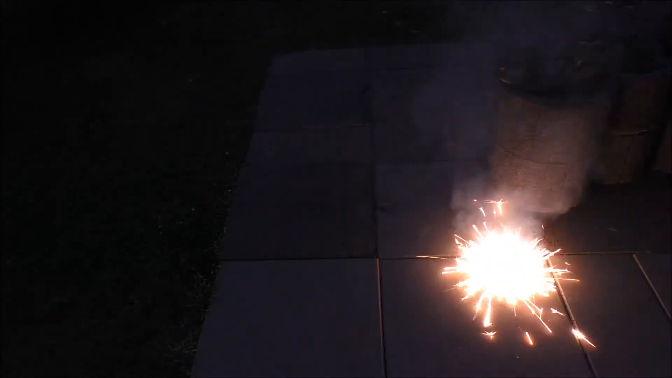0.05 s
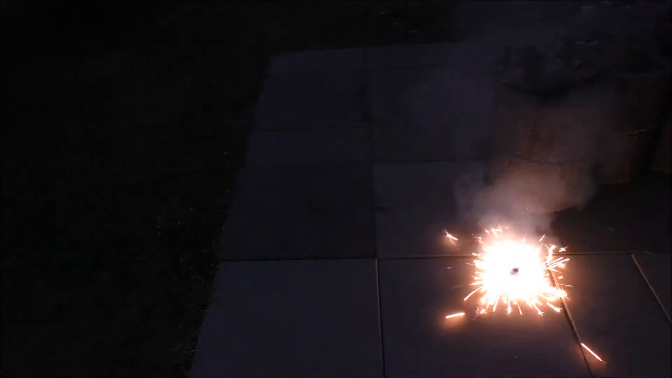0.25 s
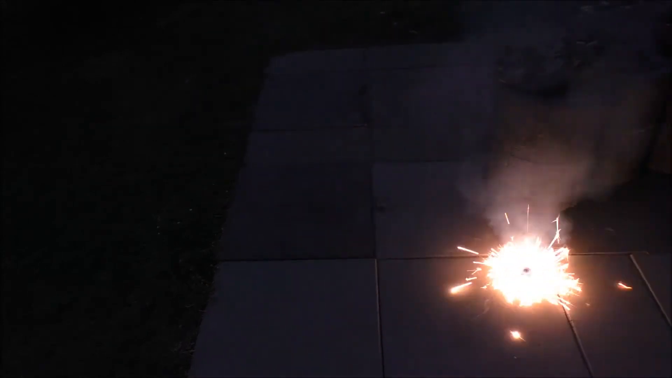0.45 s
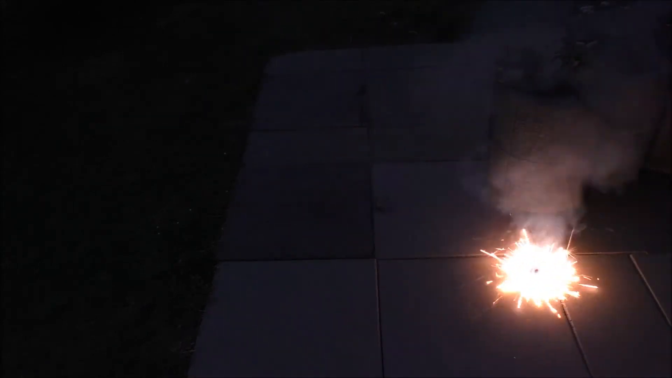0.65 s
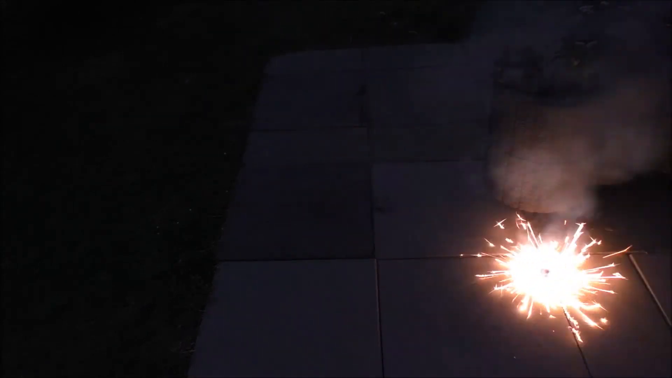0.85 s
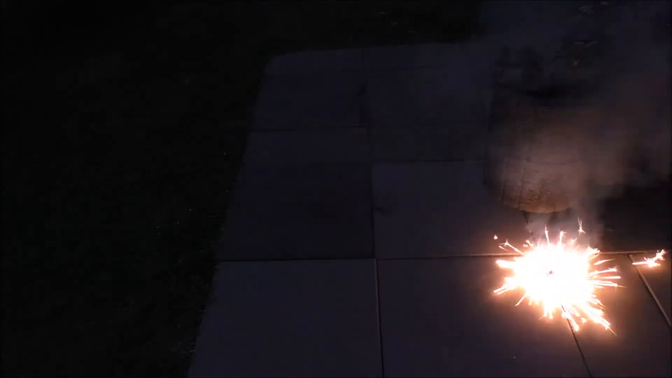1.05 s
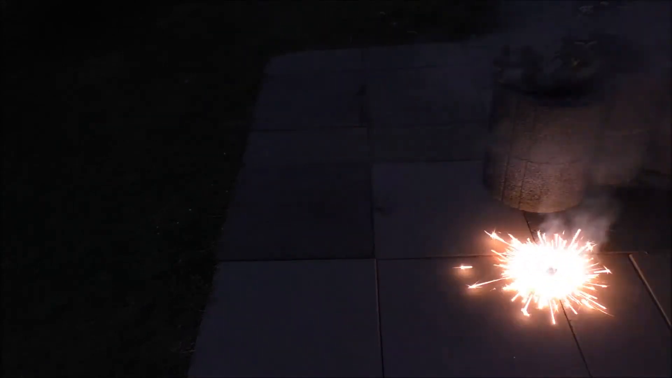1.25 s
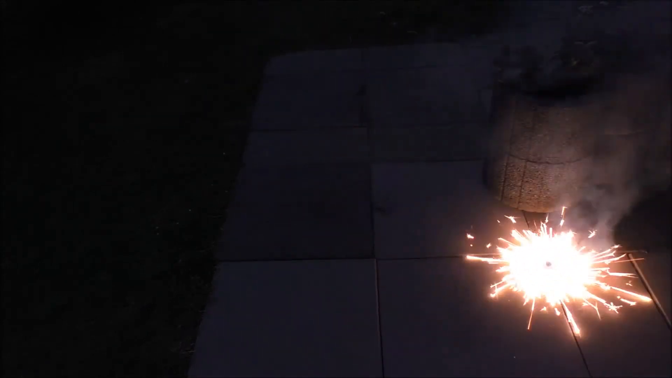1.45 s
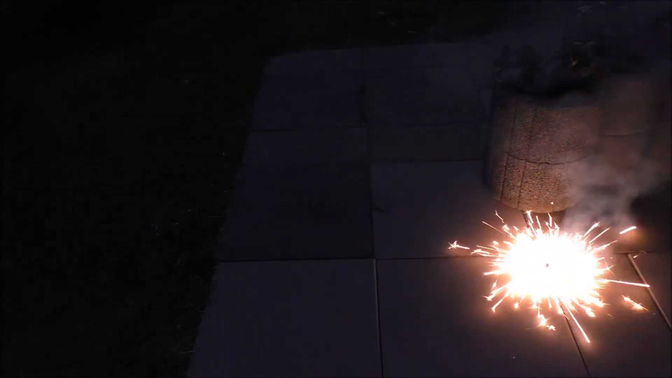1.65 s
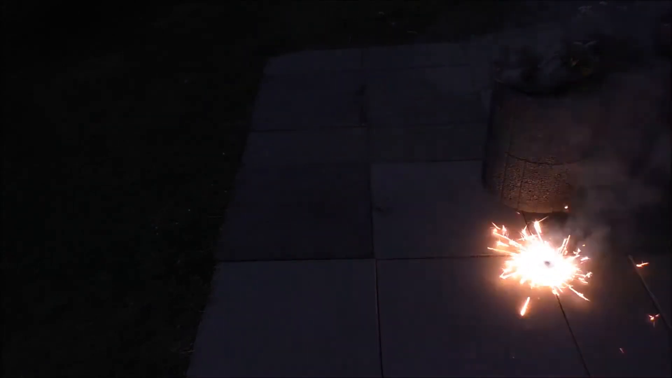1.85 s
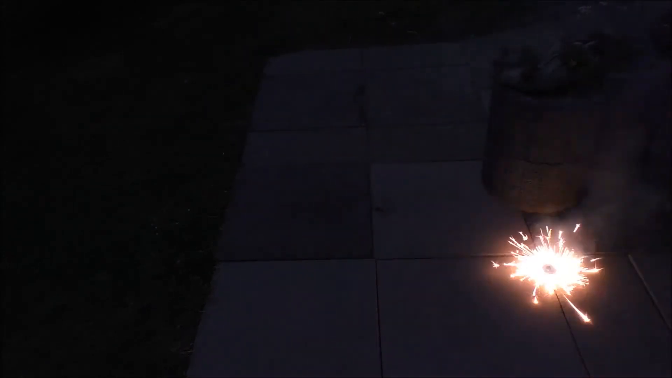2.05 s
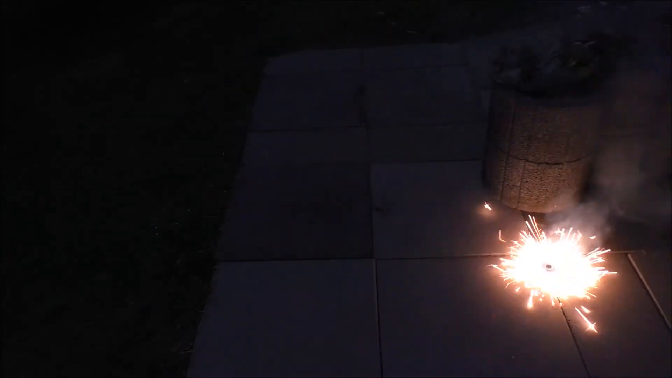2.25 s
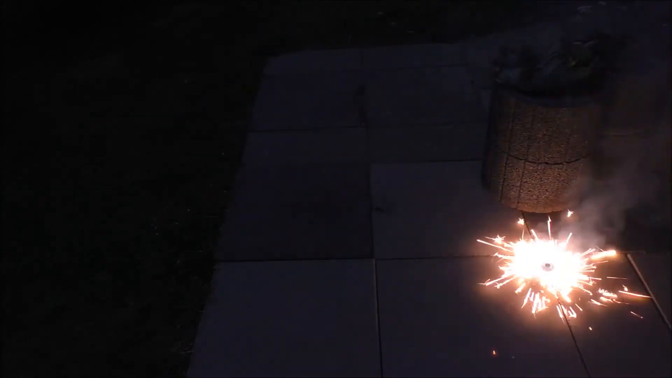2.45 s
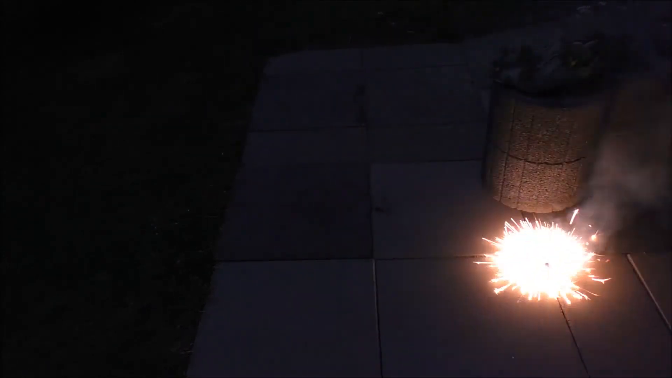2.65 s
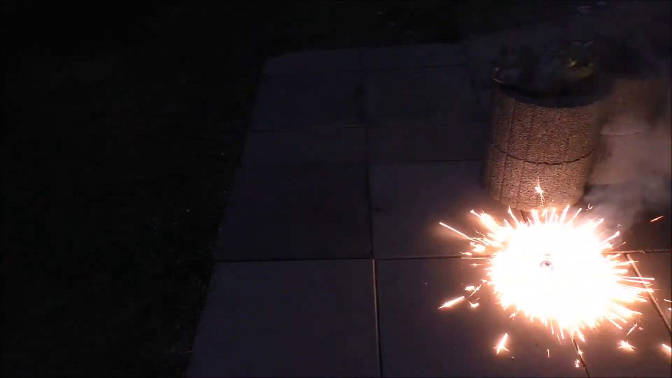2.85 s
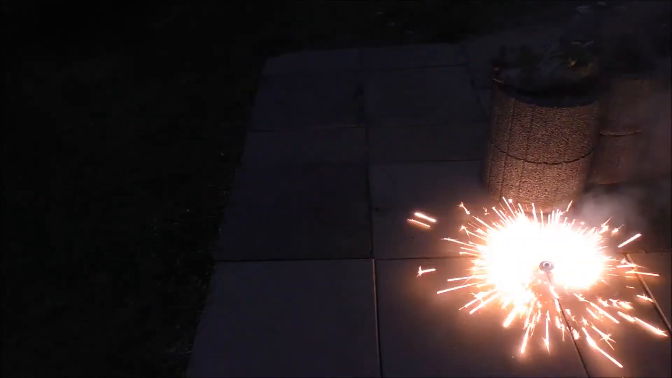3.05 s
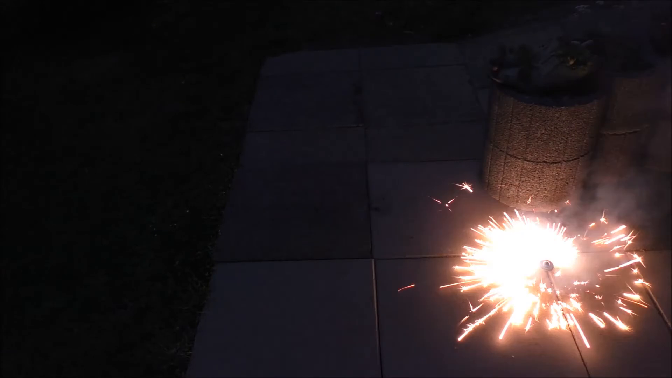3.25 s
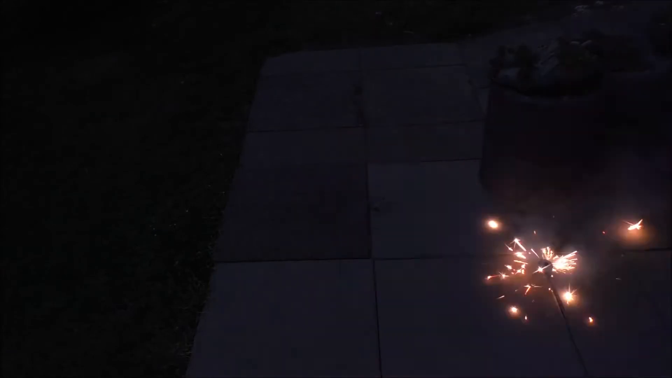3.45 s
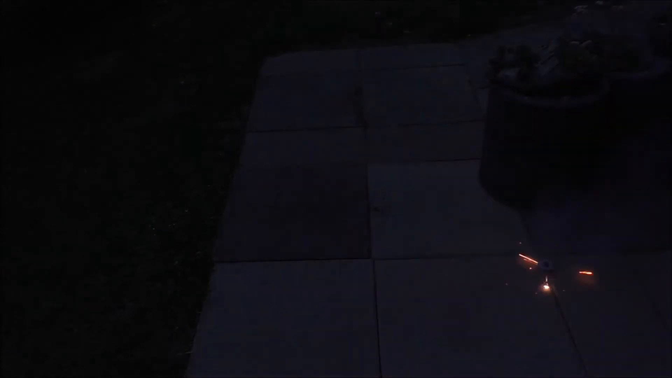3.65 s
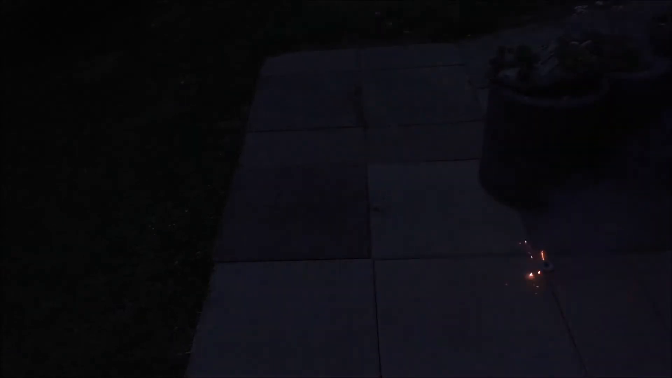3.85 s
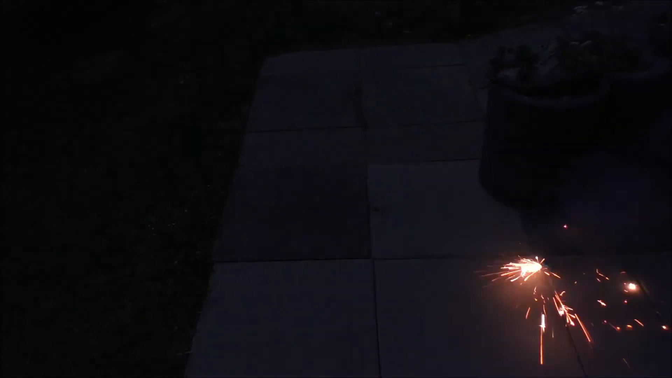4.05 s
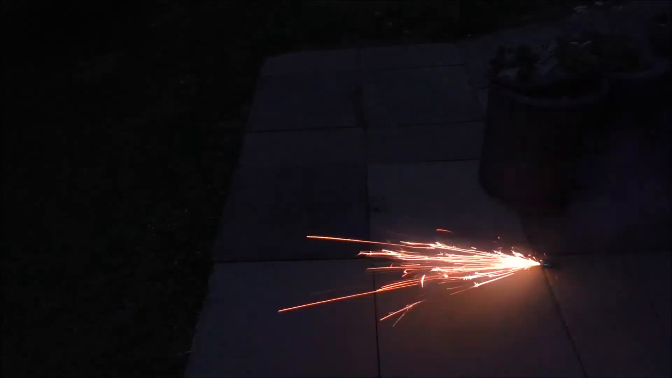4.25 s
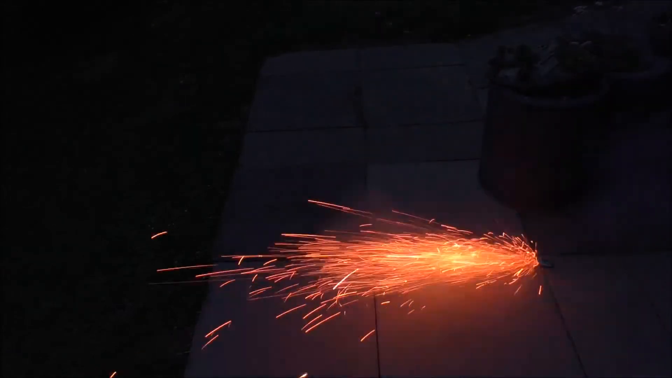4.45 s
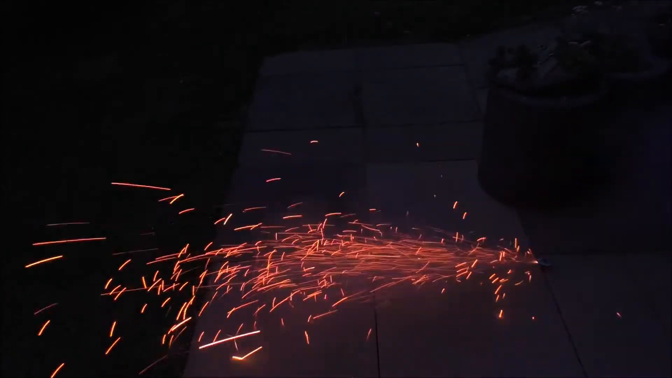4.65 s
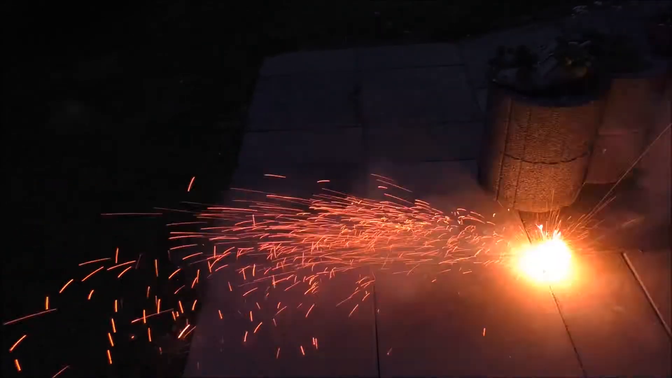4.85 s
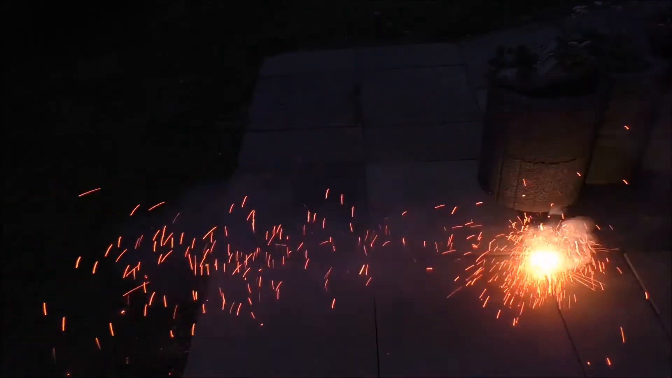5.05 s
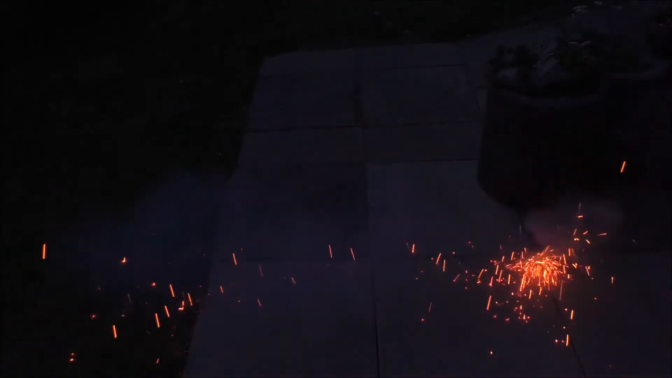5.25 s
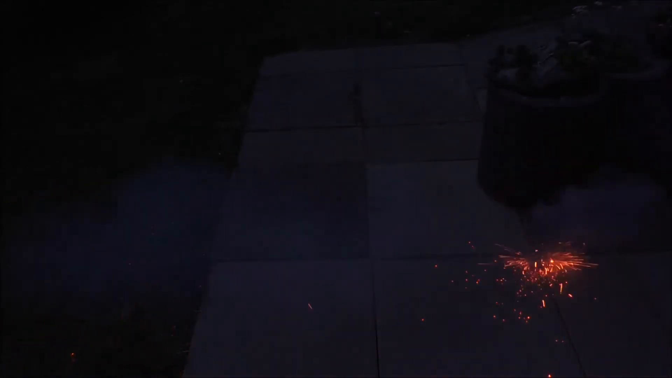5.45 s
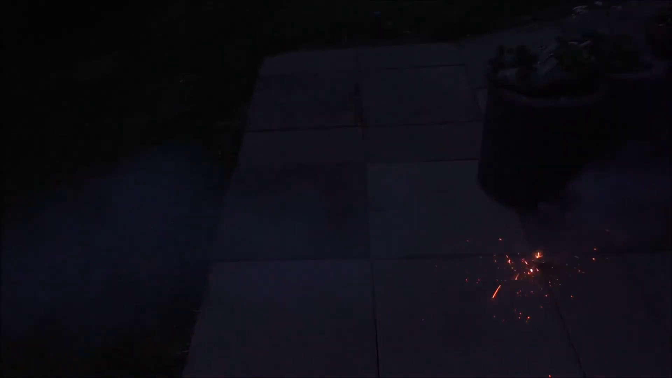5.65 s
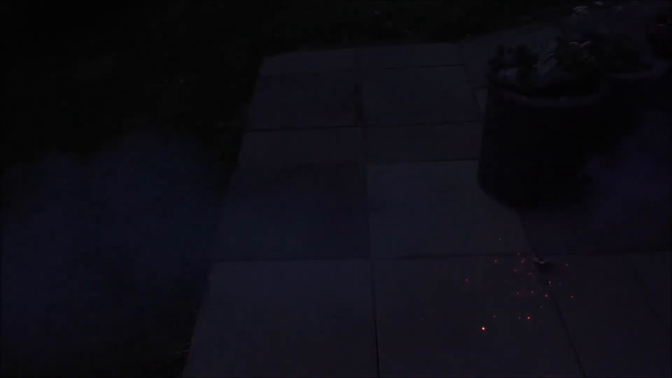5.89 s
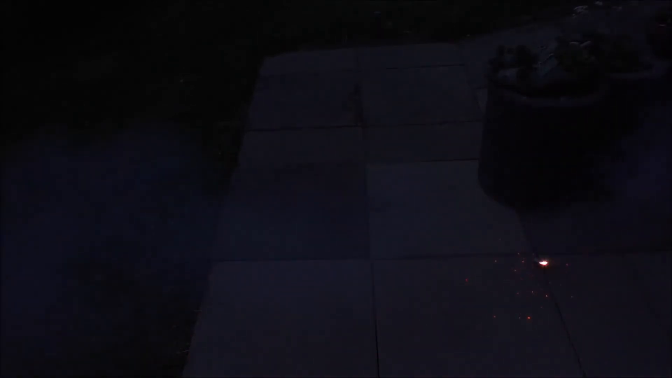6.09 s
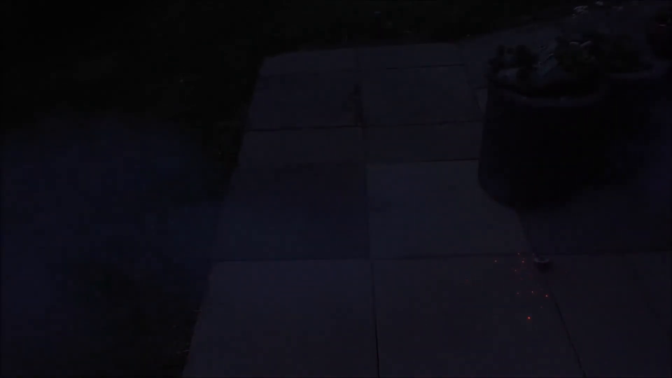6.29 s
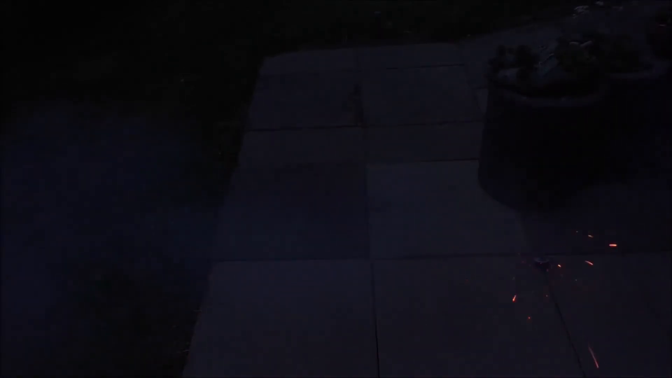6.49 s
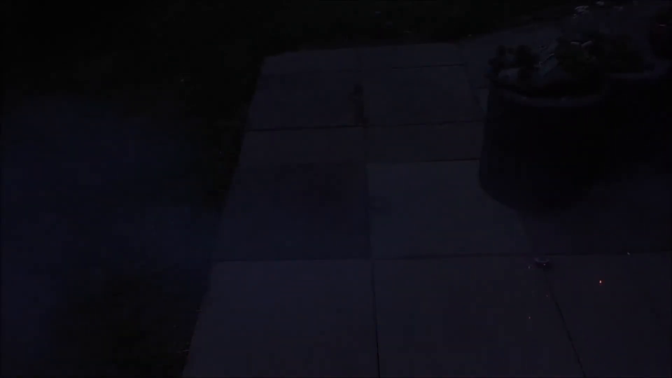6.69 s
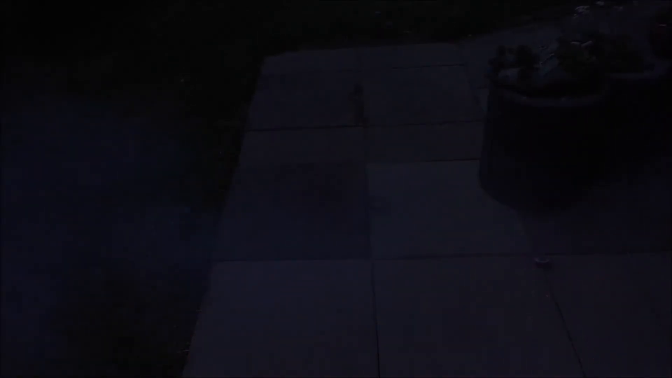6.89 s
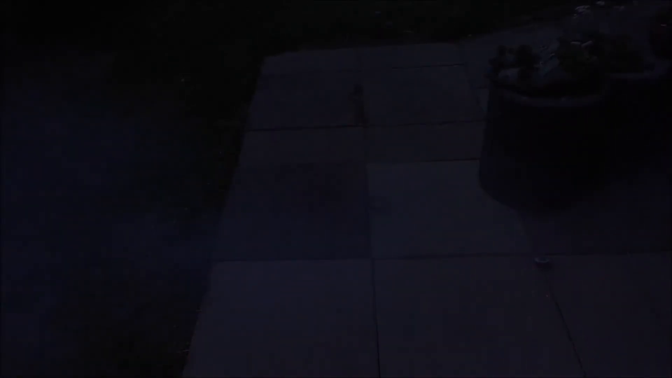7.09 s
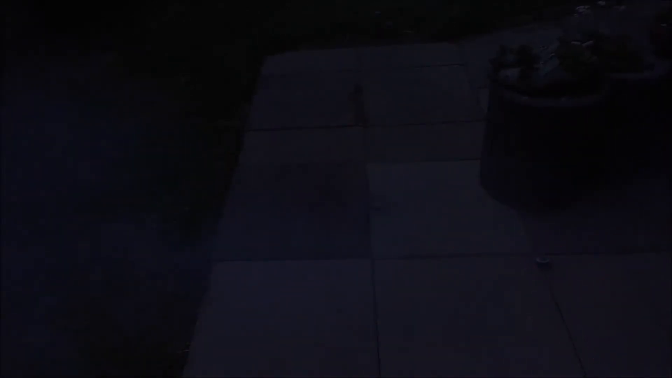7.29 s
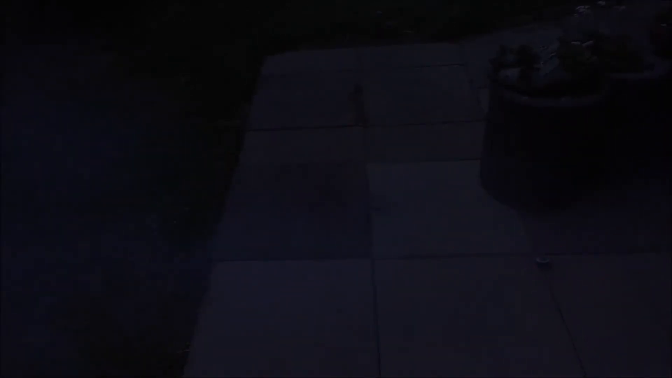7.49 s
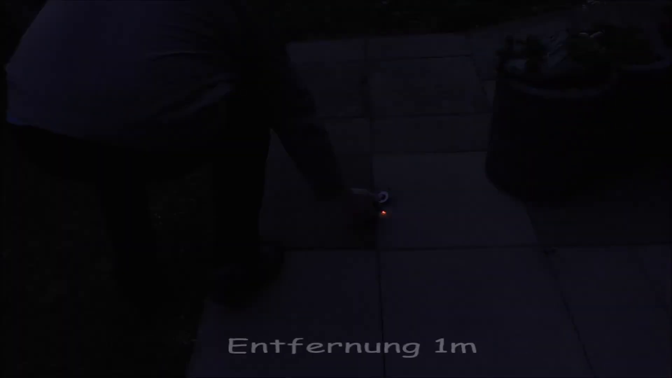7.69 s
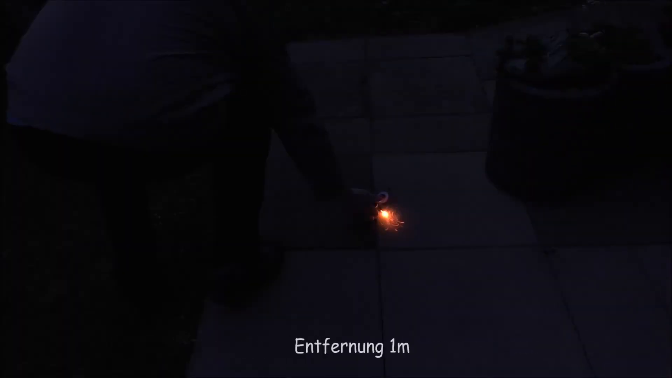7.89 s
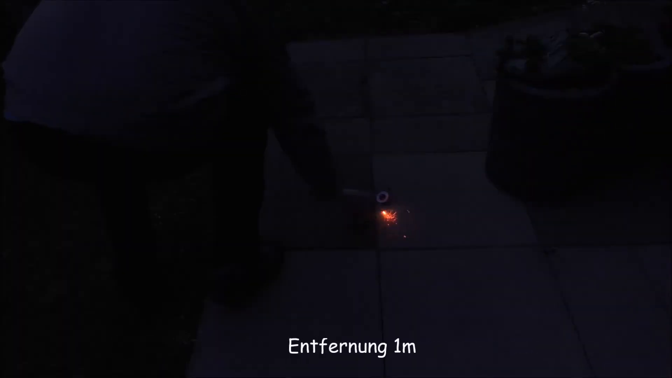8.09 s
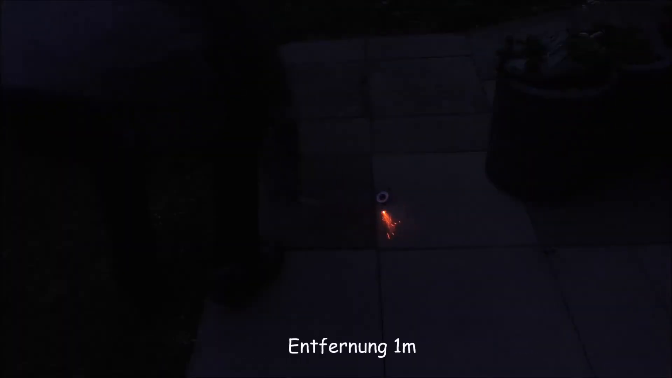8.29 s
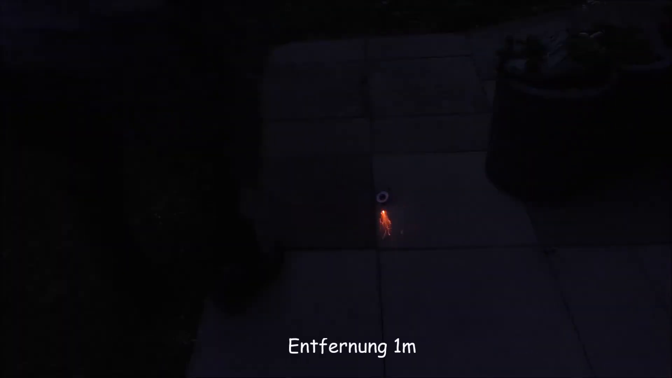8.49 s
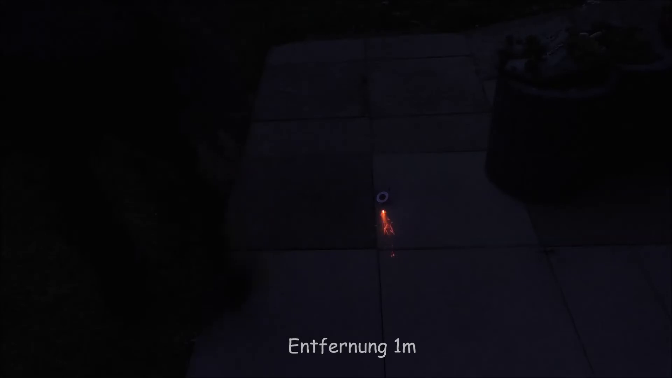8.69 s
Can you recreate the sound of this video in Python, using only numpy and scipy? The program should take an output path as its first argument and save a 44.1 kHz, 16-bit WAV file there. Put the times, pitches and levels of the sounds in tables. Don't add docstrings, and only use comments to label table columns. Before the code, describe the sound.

Night, outdoors on a paved patio, heard through a small mono camera microphone with a ringing upper-mid edge. From 0 to 3.5 s a spinning firework hisses loudly a few metres away, fluttering about 32 times a second, swelling near 1.7, 2.4 and strongest around 2.9 s; wind buffets low, with a thud near 3.3. It chokes at 3.5 to a weak thin hiss. At 4.0 a jet rushes up, peaking near 4.15, then sputters as ragged spray until 4.9. Pops begin at 4.27, crowd together, then become dry sharp cracks through 5.6 over fading embers, with short wall reflections. Isolated cracks hit at 6.18, 6.46 and, loudest, 6.64. Faint distant night rumble and thin insects fill 6.9-7.6. At 7.62 the scene cuts closer: a tiny squeak, a lighter click at 7.75, then a fuse fizzing unevenly from 7.8 to the end at about 8.7, over a faint, fading low machine hum.

```python
import sys
import numpy as np
from scipy import signal
from scipy.fft import rfft, irfft, next_fast_len
from scipy.io import wavfile
from scipy.ndimage import uniform_filter1d

SR = 44100
rng = np.random.default_rng(int(sys.argv[2]) if len(sys.argv) > 2 else 0)


def volts_from_decibels(level):
    exponent = np.asarray(level, float) / 20
    return 10 ** exponent


def generate_wav(sig):
    pcm = np.round(np.clip(np.atleast_2d(sig).T, -1, 1) * 32767).astype(np.int16)
    wavfile.write(sys.argv[1], SR, pcm)


N = 384993
SCENE_CHANGE_S = 7.62


def level(x, db):
    return x * volts_from_decibels(db) / np.sqrt(np.mean(x ** 2))


def curves(table):
    s, *columns = np.transpose(table)
    time_s = np.arange(N) / SR
    return [np.interp(time_s, s, c, left=-150, right=-150) for c in columns]


def band(x, lo_hz, hi_hz):
    return signal.sosfilt(signal.butter(2, [lo_hz, hi_hz], "band", fs=SR, output="sos"), x)


def ring(x, hz, width_hz):
    return signal.lfilter(*signal.iirpeak(hz, hz / width_hz, fs=SR), x)


def colour(x, tone):
    hz, db = np.transpose(tone)
    size = next_fast_len(len(x))
    f = np.fft.rfftfreq(size, 1 / SR) + 1
    gain = volts_from_decibels(np.interp(np.log(f), np.log(hz), db))
    return irfft(rfft(x, size) * gain, size)[:len(x)]


def walk(rate):
    k = int(SR / rate)
    steps = np.repeat(rng.standard_normal(N // k + 1), k)
    return 1.6 * uniform_filter1d(uniform_filter1d(steps, k), k)[:N]


def echo(x, ms, share):
    k = int(ms * SR / 1000)
    return x + share * np.pad(x, (k, 0))[:len(x)]


def flame(table, tone, slab_ms, slab, turn_hz, turn_db, sputter_db, roar, sizzle):
    ticks = (rng.random(N) < .05) * volts_from_decibels(2 * rng.exponential(size=N))
    sparks = ticks * rng.standard_normal(N)
    gas = rng.standard_normal(N) + level(sparks, -10.0)
    size = next_fast_len(N)
    f = np.fft.rfftfreq(size, 1 / SR)
    low = 1 / (1 + (f / 1700) ** 6)
    high = 1 / (1 + (5300 / (f + 1)) ** 6)
    comb = 1 + slab * high * np.exp(-2j * np.pi * f * slab_ms / 1000)
    spectrum = rfft(colour(gas, tone), size) * comb
    turn = turn_db * np.sin(2 * np.pi * np.cumsum(turn_hz * (1 + 0.09 * walk(3))) / SR)
    shared = turn + sputter_db * (walk(12) + 1.0 * walk(70))
    parts = [irfft(spectrum * w, size)[:N] for w in (1 - low - high, low, high)]
    flow = curves(table)[0]
    levels = [flow]
    for db, slope in (roar, sizzle):
        levels.append(np.where(flow > -99, db + slope * (flow + 30), flow))
    out = np.zeros(N)
    for part, db in zip(parts, levels):
        out += level(part, db + 0.65 + shared + .5 * sputter_db * walk(25))
    return out


# [dB, hiss]
SPIN_FLOW = [(0, -27.5), (.25, -28.5), (.4, -27.5), (1.4, -29), (1.68, -23.5), (1.9, -29.5), (2.05, -35.5),
             (2.14, -31), (2.39, -25), (2.6, -30.5), (2.68, -29), (2.72, -25), (2.85, -22), (3.28, -23.5),
             (3.34, -26), (3.46, -25), (3.51, -35.5), (3.53, -44)]
# columns pitch_hz [Hz], level_db [dB per Hz]
SPIN_TONE = [(47, -46), (80, -8), (162, -9), (375, -6.5), (478, -9.5), (695, -5.5), (867, -9), (947, -2.5),
             (1100, -8), (1610, -7), (3120, 3), (4530, -4.5), (7370, -9), (8600, -8.5), (15600, -9.5)]


def spinner():
    return flame(SPIN_FLOW, SPIN_TONE, 1.3, 0.098, turn_hz=32.37, turn_db=0.8, sputter_db=0.7,
                 roar=(-34.5, .75), sizzle=(-31.5, .9))


def camera_gain_db():
    night_db, ducked_db, ducked_s, recover_db_per_s = -60.5, -75, 5.99, 27
    t = np.arange(N) / SR
    gain_db = np.clip(ducked_db + recover_db_per_s * (t - ducked_s), ducked_db, night_db)
    ducking_db = (gain_db - night_db) * (t > ducked_s - .15)
    return gain_db, ducking_db


# [dB, buffeting]
GUSTS = [(0.0, -26), (0.05, -20), (0.14, -33.5), (2.21, -37), (2.28, -28), (2.72, -43), (3.31, -28),
         (3.33, -21), (3.72, -37.5), (5.47, -58), (6.25, -45), (6.42, -31), (6.47, -46.5), (7.51, -49),
         (7.61, -39.5), (7.71, -58), (8.63, -51), (8.73, -59)]


def wind(ducking_db):
    t = np.arange(N) / SR
    buffet_db = curves(GUSTS)[0]
    buffet = level(band(band(rng.standard_normal(N), 11, 35), 10, 44), buffet_db)
    rumble_db = -51.5 + 0.29 * (buffet_db + 39) + 2 * walk(7.6)
    rumble_db += .7 * ducking_db
    rumble_db += 5.5 * (t > SCENE_CHANGE_S)
    rumble_db += 11 * np.exp(-((t - 3.31) / .06) ** 2)
    rumble = level(band(rng.standard_normal(N), 61, 150), rumble_db)
    self_noise = level(rng.standard_normal(N), -78.5)
    return buffet + rumble + self_noise


# columns pitch_hz [Hz], level_db [dB per Hz]
NIGHT_TONE = [(88, -24), (150, -2), (221, -4), (632, -12.5), (753, -12.5), (1770, -23.5), (3230, -16),
              (4770, -37), (7170, -38.5), (7600, -41), (15600, -43.5)]


def night(gain_db):
    smoulder_s, smoulder_db, fade_db_per_s = 5.41, -55, 51
    t = np.arange(N) / SR
    far = volts_from_decibels(gain_db)
    far += volts_from_decibels(smoulder_db - fade_db_per_s * np.maximum(t - smoulder_s, 0))
    return far * level(colour(rng.standard_normal(N), NIGHT_TONE), 2.8 + 1.7 * walk(17))


# [dB, hiss]
STALL_FLOW = [
    (3.52, -36.5),
    (3.554, -31),
    (3.59, -39),
    (3.7, -39.5),
    (3.82, -40.5),
    (3.84, -43),
    (3.91, -41.5),
    (3.93, -38),
    (3.99, -39),
]
# columns pitch_hz [Hz], level_db [dB per Hz]
STALL_TONE = [(120, -42), (200, -17), (960, -9), (1600, -10), (3000, -1.5), (4800, -13), (7300, -23.5),
              (8800, -15), (10300, -21.5), (11300, -10), (12400, -13), (13300, -23.5), (15600, -21)]


def stall():
    return flame(STALL_FLOW, STALL_TONE, 1.0, 0.084, turn_hz=22.3, turn_db=-0.5, sputter_db=0.5,
                 roar=(-37, .45), sizzle=(-25, 1.9))


# [dB, hiss]
JET_FLOW = [
    (3.97, -44),
    (4.0, -32.5),
    (4.062, -24.5),
    (4.12, -30),
    (4.155, -22),
    (4.31, -24.5),
    (4.33, -29.5),
    (4.4, -29),
]
# [dB, hiss]
SPRAY_FLOW = [
    (4.4, -30.5),
    (4.6, -30.5),
    (4.625, -42),
    (4.7, -34.5),
    (4.8, -32),
    (4.87, -37),
]
# columns pitch_hz [Hz], level_db [dB per Hz]
JET_TONE = [(47, -45), (80, -8.5), (257, -5), (903, -3.5), (1500, -8.5), (1830, 0.5), (2090, -7), (3100, 1),
            (5270, -9.5), (6860, -5), (10200, -2), (12600, 3), (15600, -5.5)]


def jet():
    rush = flame(JET_FLOW, JET_TONE, 1.05, .2, turn_hz=20, turn_db=-0.5, sputter_db=1.0,
                 roar=(-35, .6), sizzle=(-27.5, 1.2))
    spray = flame(SPRAY_FLOW, JET_TONE, 1.05, .2, turn_hz=21, turn_db=2.4, sputter_db=2.5,
                  roar=(-31, .9), sizzle=(-27, 1.1))
    return rush + spray


def bursts(table, ring_hz, snap_db, snap_slope):
    size = 1024
    out = np.zeros((2, N + size))
    for s, crack_db, thump_db, ms in table:
        chance = rng.standard_normal(128)
        hz = ring_hz * (1 + .025 * chance[-3])
        count = int(np.clip((ms - .8) * 1.25 * hz / 1000, 1, 16))
        times = np.maximum(np.arange(count) * SR / hz + 1.5 * chance[:count], 0).astype(int)
        blast, sparks, push = np.zeros((3, size))
        blast[times] = np.hanning(count + 2)[1:-1] * volts_from_decibels(2 * chance[16:16 + count])
        sparks[times + np.arange(count) % 5] = blast[times] * np.sign(chance[32:32 + count])
        push[times[count // 3]] = 1
        slab_ms = 1.05 + .03 * chance[-1]
        blast, sparks, push = (echo(p, slab_ms, 0.23) for p in (blast, sparks, push))

        crack = ring(ring(blast, hz, 900), hz, 1600)
        body = ring(push, 2050 * (1 + 0.081 * chance[-5]), 750)
        crack += volts_from_decibels(-6 + 4.4 * chance[-4]) * np.sqrt(count) * body
        thump_lo_hz = min(110 * volts_from_decibels(-.7 * min(thump_db, 0)), 1200)
        thump_hi_hz = 1900 * volts_from_decibels(-.8 * max(thump_db, 0))
        thump = band(push, thump_lo_hz, thump_hi_hz)
        snap = band(ring(sparks, 7000 * volts_from_decibels(chance[-2]), 4500), 5000, 13500)

        parts = [(crack, 1), (thump, thump_db + 2.5), (snap, snap_db + snap_slope * thump_db)]
        crack, thump, snap = (p * volts_from_decibels(crack_db + db) * np.sqrt(150 / np.sum(p ** 2)) for p, db in parts)
        i = int(s * SR)
        out[0, i:i + size] += thump + crack + snap
        out[1, i:i + size] += 0.76 * thump + 0.84 * crack + .8 * snap
        out[1, i:i + size] += volts_from_decibels(crack_db + 22) * push
    return out[:, :N]


# columns start_s [s], level_db [dB, crack], gas_db [dB, thump share], length_ms [ms]
JET_STARS = [(4.2735, -17, -5.5, .5), (4.2847, -20.5, 4, .7), (4.336, -24.5, -6, 1), (4.346, -23, -2, 1),
             (4.3763, -17, -11, 4.5), (4.382, -22.5, 2, 1), (4.3854, -18.5, 5, .7), (4.3941, -28, 3, .6),
             (4.409, -22.5, -3.5, .1), (4.4386, -23.5, -3.5, .1), (4.4906, -10, 1.5, 1.2),
             (4.5522, -24, 8, 4), (4.5605, -19.5, -2, .2), (4.5723, -23, 0.5, .1),
             (4.5863, -12.5, -1.5, .9), (4.5971, -23.5, 0, 1.6), (4.6008, -10, -7, 2.6),
             (4.613, -29, -6, .6), (4.6525, -33, 0, .1), (4.6913, -26.5, -8, 2.6)]
PUFF_STARS = [(4.7181, -29, 6, 4.5), (4.7266, -24, -1.5, .2), (4.737, -26, 1, .8), (4.7489, -19, -2, 1.7),
              (4.7508, -15.5, 0, .8), (4.7654, -19, 3.5, 1.6), (4.7706, -28.5, 5, .4),
              (4.7745, -18.5, 2.5, .7), (4.7857, -22.5, 0.5, .1), (4.8049, -25, 9, 3.5),
              (4.8567, -17.5, 7, 1.2), (4.8647, -9, -9, .9), (4.872, -20.5, -9.5, .8)]
BRIGHT_STARS = [(4.8935, -16.5, 0, .5), (4.9009, -21, -3, .6), (4.9102, -14, -10.5, .7),
                (4.922, -27.5, -5.5, .1), (4.9323, -37.5, 3, .9), (4.9441, -38.5, -1, .1),
                (4.9555, -22, -7.5, .1), (4.962, -15.5, -1, 1.1), (4.9763, -21.5, -6, .1),
                (5.0348, -40, 4.5, 4.3), (5.075, -13, -1, 3.4)]
DRY_STARS = [(5.1107, -17, 0, .7), (5.1389, -23, -4, 3.9), (5.1428, -25.5, -4, 3.1),
             (5.2157, -30.5, -6.5, 1.1), (5.2227, -5, -8, 1.4), (5.2385, -17, -7.5, 3.4),
             (5.2423, -10, -12.5, 1.3), (5.279, -28.5, -14, 1.1), (5.2869, -27, -17.5, 4.5),
             (5.3157, -20.5, -14.5, 4.8), (5.3349, -8.5, -7, 1.2), (5.3659, -26.5, -6.5, 1.1),
             (5.3886, -9.5, -13, 1.1), (5.4357, -13.5, -21, 4.9), (5.4464, -22.5, -6, .9),
             (5.4612, -36, -8, 1.2), (5.4734, -29, -17, 1.3), (5.501, -13, -5.5, 1),
             (5.5605, -7, -10.5, 1.5), (5.5758, -28, -24, 1.2), (5.6183, -21, -7, 3.4)]
LAST_STARS = [
    (5.7163, -40, -7.5, 1.4),
    (5.7313, -22, -9.5, .8),
    (5.7557, -38.5, -10.5, 1.2),
    (5.7708, -28, -10, 4),
    (5.8049, -28.5, -14.5, 1),
    (5.9684, -34.5, -12.5, 5.2),
    (6.178, -9.5, -9.5, 1.5),
    (6.4565, -10.5, 1, 1),
    (6.6378, -6, -10.5, 3.5),
]


def stars():
    out = bursts(JET_STARS, 2600, snap_db=-4, snap_slope=0.45)
    out += bursts(PUFF_STARS, 2700, snap_db=-9.5, snap_slope=.9)
    out += bursts(BRIGHT_STARS, 2950, snap_db=3, snap_slope=-0.27)
    out += bursts(DRY_STARS, 3170, snap_db=-7.5, snap_slope=0.16)
    out += bursts(LAST_STARS, 2960, snap_db=-6, snap_slope=0.72)
    return out


def patio(direct, sent):
    wall_ms = 11.75
    t = np.arange(SR) / SR
    early = volts_from_decibels(-32.5 - 60 * t / 0.055) * (t > .002)
    late = volts_from_decibels(-49 - 60 * t / 0.49) * np.clip(t / 0.048, 0, 1)
    clumps = volts_from_decibels(1.6 * np.repeat(rng.standard_normal(SR // 50), 50))
    scatter = rng.standard_normal(SR) * clumps
    scatter = band(volts_from_decibels(-3.5) * band(scatter, 200, 4400) + ring(scatter, 3250, 700), 100, 6500)
    dull = band(direct, 200, 4900)
    slap = echo(dull, wall_ms, .11) - dull
    return direct + slap + signal.fftconvolve(sent, scatter * (early + late))[:N]


# [dB, hiss]
EMBER_FLOW = [
    (4.875, -38.5),
    (4.97, -36.5),
    (5.059, -43),
    (5.22, -43.5),
    (5.45, -49),
    (5.65, -58),
]
# columns pitch_hz [Hz], level_db [dB per Hz]
EMBER_TONE = [(88, -36.5), (150, -3.5), (530, -7), (1150, -10), (2460, -6.5), (3300, 0.5), (4000, -4.5),
              (4770, -3.5), (14700, -22.5), (15600, -24)]


def ember():
    return flame(EMBER_FLOW, EMBER_TONE, 0.83, .1, turn_hz=21, turn_db=-3.7, sputter_db=-1.0,
                 roar=(-32, 1.05), sizzle=(-26, 1.9))


# columns start_s [s], end_s [s], pitch_hz [Hz], width_hz [Hz], level_db [dB]
CALLS = [
    (6.94, 7.42, 4150, 500, -52.5),
    (6.92, 7.3, 4800, 980, -64),
    (7.2, 7.6, 7080, 200, -63.5),
    (7.415, 7.46, 4300, 400, -66.5),
    (7.635, 7.66, 2500, 200, -48),
]


def calls():
    t = np.arange(N) / SR
    out = np.zeros(N)
    for start, end, hz, width_hz, db in CALLS:
        i, n = int(start * SR), int((end - start) * SR)
        flutter = uniform_filter1d(rng.standard_normal(SR), int(SR / width_hz))[:n]
        rise_hz_per_s = 20000 if .03 < end - start < .06 else 160
        tone = np.sin(2 * np.pi * np.cumsum(hz + rise_hz_per_s * t[:n]) / SR)
        tone *= .5 + level(flutter, 0)
        out[i:i + n] += tone * volts_from_decibels(db - 33.5 * t[:n]) * signal.windows.tukey(n, .14)
    return out


# columns start_s [s], level_db [dB, crack], gas_db [dB, thump share], length_ms [ms]
LIGHTER = [
    (7.6164, -58.5, 10, 3.9),
    (7.7524, -13.5, -25, 1.3),
    (8.1366, -45, 7, 2.6),
]


def lighter():
    return bursts(LIGHTER, 3330, snap_db=1.6, snap_slope=.05)


def hum():
    t = np.arange(N) / SR
    hum_db = np.clip(-51 - 60 * (t - 8.05), -63, -51) + 2 * walk(10)
    hz = 168 + 3 * np.maximum(t - SCENE_CHANGE_S, 0)
    tone = np.sqrt(2) * np.sin(2 * np.pi * np.cumsum(hz) / SR)
    return (t > SCENE_CHANGE_S) * volts_from_decibels(hum_db) * tone


# [dB, hiss]
LULL_FLOW = [
    (7.622, -55),
    (7.64, -61),
    (7.712, -66),
    (7.745, -64),
]
# [dB, hiss]
FUSE_FLOW = [
    (7.79, -45),
    (7.818, -50),
    (7.89, -38.5),
    (8.112, -42.5),
    (8.3, -38),
    (8.424, -40.5),
    (8.476, -38.5),
    (8.73, -40),
]
# columns pitch_hz [Hz], level_db [dB per Hz]
FUSE_TONE = [(120, -16), (200, -1), (430, -1), (876, -6), (1460, -3.5), (1850, -7), (3080, -5), (5620, -19),
             (7800, -22), (11900, -22.5), (15600, -26.5)]


def fuse():
    return flame(LULL_FLOW + FUSE_FLOW, FUSE_TONE, 1.27, .35, turn_hz=21, turn_db=.2, sputter_db=0.98,
                 roar=(-35, .9), sizzle=(-35, 1.05))


def scene():
    gain_db, ducking_db = camera_gain_db()
    mono = spinner() + wind(ducking_db) + night(gain_db)
    mono += stall() + jet() + ember()
    mono += patio(*(stars() + lighter()))
    mono += calls() + hum() + fuse()
    return np.array([mono, mono])


def low_pass(x):
    return signal.sosfilt(signal.butter(12, 16480, fs=SR, output="sos"), x)


def record(dry):
    top = signal.ellip(10, .2, 70, 15720, fs=SR, output="sos")
    x = np.clip(signal.sosfilt(top, dry), -1, 1)
    side = volts_from_decibels(-36.5) * band(x[0] * np.sign(rng.standard_normal(N)), 5000, 15000)
    return low_pass(x + side * np.array([[1], [-1]]))


dry = scene()
out = record(dry)
generate_wav(out)
```